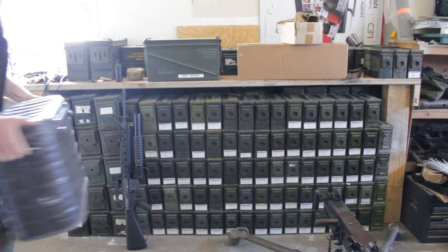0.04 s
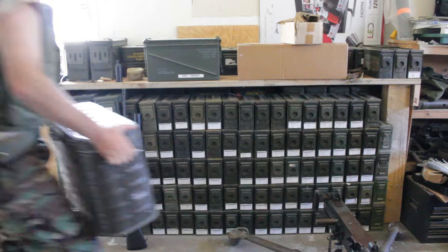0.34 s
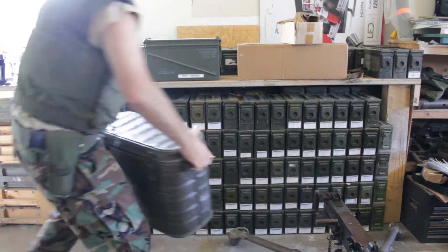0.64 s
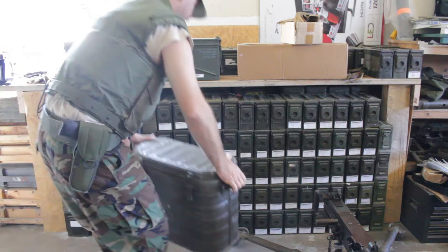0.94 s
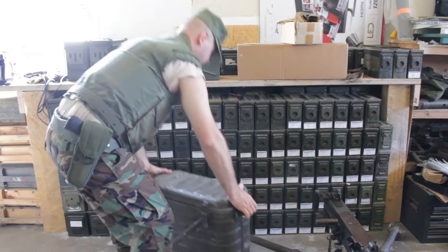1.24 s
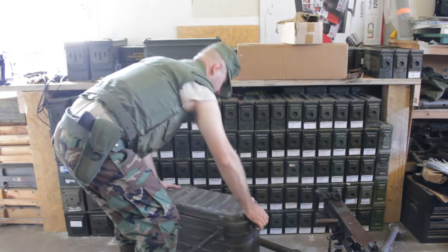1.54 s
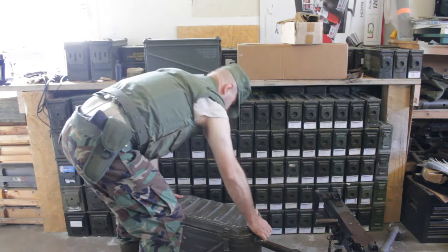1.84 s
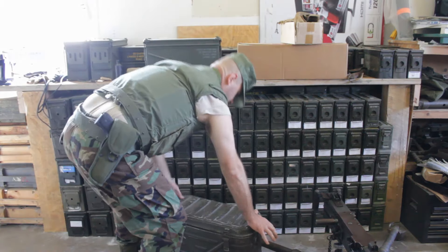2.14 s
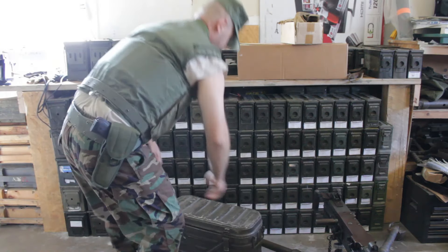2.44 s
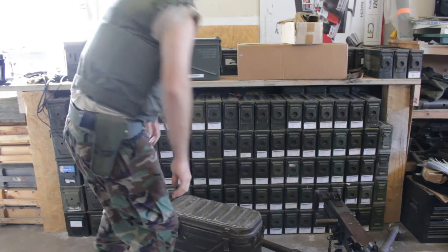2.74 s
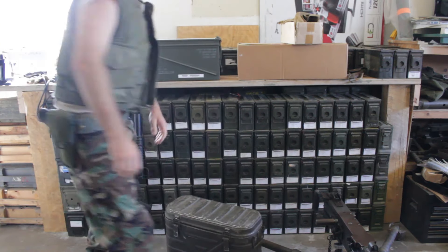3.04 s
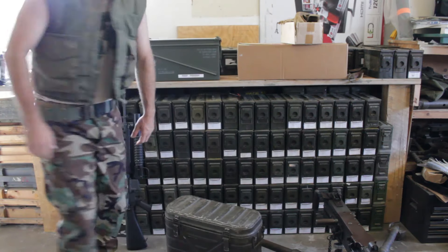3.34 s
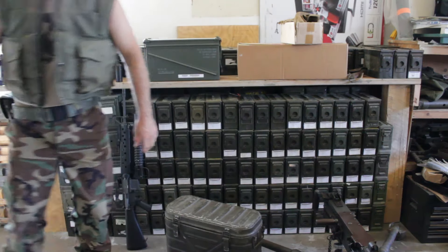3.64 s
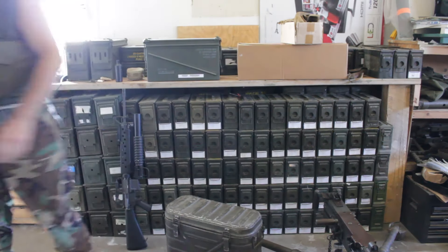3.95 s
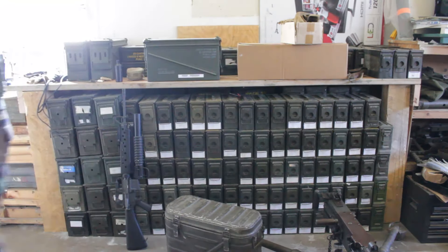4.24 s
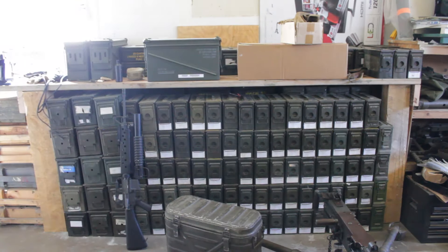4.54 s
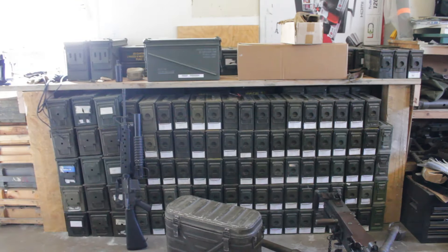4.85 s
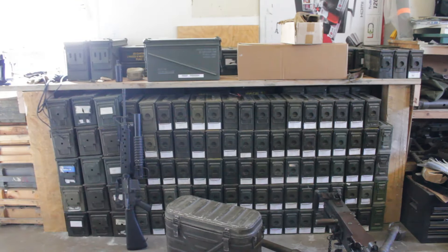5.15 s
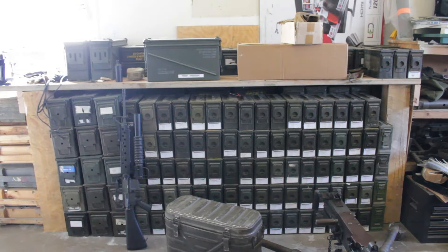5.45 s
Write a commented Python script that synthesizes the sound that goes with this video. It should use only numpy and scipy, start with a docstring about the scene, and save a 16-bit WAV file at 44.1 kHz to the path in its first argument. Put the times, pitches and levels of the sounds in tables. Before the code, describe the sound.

A few boot steps, rustling fabric and creaking straps lead up to the loud, hollow crash of a metal container landing on a concrete floor. Dry hinges squeak and two steel handles rattle to rest against its side. More steps follow with small clicks of gear and a juddering rubber scuff. The sounds are near, in a slightly echoing workshop with a faint steady hum.

```python
"""A workshop with a concrete floor. A man carries in a big metal container and sets it down with a
crash and a hollow boom. Its two handles squeak on dry hinges, fall against the shell and bounce to
rest. He walks off, boots thudding, cloth swishing and buckles tapping, and one rubber sole judders
over the floor. Shelves and walls answer the hits; a faint hum and hiss lie under it all."""
import sys
import numpy as np
from scipy import signal
from scipy.fft import rfft, irfft, next_fast_len
from scipy.io import wavfile
from scipy.ndimage import map_coordinates

SR = 44100
rng = np.random.default_rng(int(sys.argv[2]) if len(sys.argv) > 2 else 0)


def wrap_up_sound(samples):
    """Save the sound to the file named by the first command line argument, as 16-bit audio."""
    columns = np.atleast_2d(samples).T
    # keep every value between -1 and 1, then stretch to whole-number steps
    tamed = np.clip(columns, -1, 1)
    steps = np.round(tamed * 32767).astype(np.int16)
    wavfile.write(sys.argv[1], SR, steps)


N = 250488
TIME = np.arange(N) / SR
AGE = np.arange(SR * 3 // 4) / SR  # seconds since a hit

# The container hits the floor. Each row: start in seconds, crash level in dB, decay (t60) in seconds.
LANDINGS = [(1.8157, -3, 0.056), (1.8245, -17.5, 0.2), (1.891, -28, 0.05), (1.952, -31, 0.044)]
# Ringing metal. Each row: pitch in Hz, relative level in dB, decay (t60) in seconds.
SHELL_MODES = [(99.5, -9, 0.35), (129, -4.5, 0.22), (186.6, 4, 0.41), (227.5, 2, 0.33), (260, 3.5, 0.31),
               (310.4, 4, 0.2), (328.5, 6, 0.21), (371.5, 4, 0.25), (408, -2, 0.23), (442, -5.5, 0.37),
               (515, -10, .25), (584, -5, 0.35), (649, -4.5, 0.27), (810, -11, 0.26), (833, -21, 0.45),
               (870, -13, 0.33), (1003, -1.5, 0.18), (1076, -4, 0.2), (1200, -31, 0.55), (1466, -8, 0.16)]
HANDLE_MODES = [(1130, -6, 0.2), (2900, 1, 0.083), (3550, -8, 0.084), (4280, -5, .15), (4630, 1, 0.1),
                (5030, -2, 0.084), (5740, -3, 0.118), (5930, -4, 0.14), (8370, -4, 0.13), (11330, -8, 0.11)]
PANEL_MODES = [(302, -11, 0.2), (381, -5, 0.072), (445.5, -1.5, 0.093), (532, -4, 0.046), (602, 4.5, 0.037),
               (709, -3, 0.052)]  # the end panel under a handle

# The handles fall on the shell and rebound ever sooner. Each entry: start in seconds.
BOUNCE_TIMES = [2.172, 2.3664, 2.536, 2.674, 2.8066, 2.9253, 3.0255, 3.111, 3.171, 3.2194]
# The second handle grazes the rim as it falls. Each row: start in seconds, clank level in dB.
RIM_GRAZES = [(2.3445, -28), (2.353, -26.5)]
CLANK_DB, CLANK_LOSS_DB = -15.5, 3.5  # the first clank; what each rebound loses
CLANK_T60_S, CLANK_T60_RATIO = 0.2, 0.93  # the first clank's decay; each decay over the one before
EDGE_DB, EDGE_SLOPE = 1, 1.38  # bright edge over the first clank; dB it moves per dB of clank
KNOCK_DB, KNOCK_LOSS_DB = -19.5, 3  # the first knock on the shell; what each rebound loses

# Squeak tones, one list per hinge. Each row: pitch in Hz, relative level in dB.
HINGE_TONES = [
    [(4425, -12), (5819, -15), (6551, -5), (8877, 0), (12760, -15), (12915, 4.5)],
    [(5771, -23), (9141, -2), (12920, -10), (14115, -17)],
]
# Moments of binding, one list per hinge.
# Each row: middle in seconds, length in seconds, squeak level in dB, scrape level in dB.
HINGE_BINDS = [
    [(2.094, .034, -33, -36), (2.13, 0.042, -41, -27), (2.25, 0.094, -28.5, -31), (2.447, 0.038, -31, -48)],
    [(2.387, 0.022, -15.5, -25.5), (2.44, 0.027, -30, -47)],
]

# Footfalls. Each row: start in seconds, thud level in dB, thud pitch in Hz, slap level in dB.
FOOTFALLS = [(.393, -24.5, 198, -29), (1.139, -35, 200, -27.5), (1.289, -45, 250, -38),
             (2.288, -40, 130, -37), (2.901, -49, 250, -35.5), (2.958, -38, 283, -30),
             (3.847, -47, 150, -45.5), (4.811, -27.5, 148, -34.5)]
# A sole rolls over grit. Each row: middle in seconds, length in seconds, level in dB.
GRIT_ROLLS = [(0.468, 0.16, -45), (3.955, .11, -45.5)]
SLIDE_S, SLIDE_LENGTH_S, RUB_DB = 4.812, 0.19, -33.5  # the boot slides: start, length, level
GRIP_S, GRIP_LENGTH_S, GRIP_DB = 4.973, 0.063, -23.5  # the sole grips: middle, length, level
SLIP_HZ = 415.5  # slips a second in the judder

# Buckles and gear tap. Each row: start in seconds, level in dB, pitch in Hz.
BUCKLE_TAPS = [(0.7013, -29.5, 960), (0.8953, -29.5, 2800), (1.0225, -29.5, 1600), (1.166, -36, 3200),
               (2.912, -35, 2760), (3.912, -38, 2800), (4.116, -36, 2590), (4.5361, -28, 3520),
               (4.5716, -31, 3300), (4.7128, -30, 5200), (4.7343, -34, 5300), (4.768, -28.5, 5170),
               (5.4636, -37.5, 2300)]
# Strained webbing creaks. Each row: start in seconds, end in seconds, level in dB, pitch in Hz.
WEBBING_CREAKS = [(1.4, 1.45, -38.5, 2540), (1.508, 1.695, -37, 2270), (4.4423, 4.63, -35, 3580)]
TICK_GAP_S, TICK_GAP_SCATTER, TICK_SCATTER_DB = .041, .08, 2  # tick spacing; spread of spacing, level
CLICK_DB, CLICK_DB_PER_OCTAVE = -.5, 2.5  # click on a tap at 2500 Hz; higher taps click harder
# One swish for each move of an arm or leg. Each row: middle in seconds, length in seconds,
# swish level in dB, pitch in Hz, level of the folds in dB.
CLOTH_MOVES = [(0.01, 0.08, -51.5, 2500, -53), (.5, 0.18, -51, 2500, -50.5),
               (0.662, 0.12, -43.5, 2290, -51), (0.79, 0.083, -46.5, 2300, -59),
               (0.917, 0.087, -38, 2560, -45), (1.042, 0.062, -42, 2230, -42.5),
               (1.17, 0.12, -44, 2600, -47), (1.406, 0.098, -44, 2630, -49), (1.602, 0.27, -45, 2460, -54),
               (2.618, 0.38, -43, 2700, -44), (2.971, 0.12, -39, 2580, -42), (3.15, 0.16, -51, 2500, -51.5),
               (3.67, 0.075, -53.5, 2300, -52), (3.91, 0.12, -47.5, 2500, -55),
               (4.113, 0.1, -39.5, 2450, -55), (4.243, .13, -38.5, 2730, -48),
               (4.41, 0.052, -54, 2000, -47), (4.555, .17, -40, 2820, -46.5),
               (4.75, 0.26, -40.5, 2800, -56)]
CLOTH_HZ = 2500  # the swish pitch that leaves CLOTH_EQ unshifted

# The workshop's hum. Each row: pitch in Hz, level in dB.
HUM_TONES = [(91, -62.5), (185, -65.5), (276, -69.5), (461, -75), (1080, -68)]
# The fader ride on the hiss. Each row: time in seconds, level in dB.
HISS_RIDE = [(0, -51.5), (.7, -51.5), (1.4, -48), (1.8, -48), (1.95, -58), (3.2, -52.5), (3.8, -64),
             (4.8, -52.5), (5.68, -59)]
# The tail off the walls. Each row: frequency in Hz, decay (t60) in seconds.
WALL_DECAY = [(100, 0.46), (400, 0.43), (2500, 0.44), (6000, .4), (15000, 0.29)]

# Tone colours. Each row: frequency in Hz, relative spectral level in dB.
CRASH_EQ = [(40, -40), (75, -32), (110, 3), (200, -5), (400, -3.5), (550, -3), (800, -4.5), (1050, -9.5),
            (1350, -5), (1750, -14.5), (2400, -9), (2900, -14), (5000, -18), (9000, -26.5), (16000, -34)]  # container on concrete
CLANK_EQ = [(500, -25), (1200, -3), (2200, -5), (3300, 1.5), (3900, -3.5), (5300, 2.5), (7000, -11),
            (10000, -10.5), (16000, -43.5)]  # steel on steel
EDGE_EQ = [(2000, -19), (5000, -3), (8000, 2), (10000, -2.5), (11500, 2), (13000, -4), (14700, 5),
           (16000, -19)]  # the bright top of a hard hit
KNOCK_EQ = [(120, -35), (220, -13.5), (300, -7), (450, -6), (630, -0.5), (900, -7), (1300, -7.5),
            (2500, -26)]  # the hollow shell under a handle
RUB_EQ = [(150, -18), (400, -5), (900, -9.5), (1750, -5.5), (2200, -0.5), (3050, -1), (3700, -6),
          (7000, -16), (16000, -29)]  # sliding rubber
JUDDER_EQ = [(200, -20), (410, 0), (830, 5.5), (1400, -3), (2500, 0.5), (3400, 1), (5500, -11), (8000, -19),
             (16000, -29)]  # gripping rubber
CLOTH_EQ = [(500, -19), (1400, -4), (2000, 2), (2800, 1), (3900, -2), (5000, -7), (8000, -17.5),
            (16000, -22)]  # swishing fabric
FOLDS_EQ = [(130, -24), (350, -2), (700, -3.5), (1200, -1), (2500, -22.5)]  # flapping folds
AIR_EQ = [(15, -42.5), (25, -8), (92, -4.5), (108, -5), (123, -15), (175, -9), (217, -15), (270, -6.5),
          (326, -12), (373, -6), (624, -10), (1070, -10), (2350, -12.5), (3520, -14), (16000, -25.5)]  # room tone
SLAP_EQ = [(60, -24), (150, -17), (280, 1.5), (500, -10.5), (1200, -20.5), (3000, -33), (10000, -42)]
DUST_EQ = [(200, -24), (600, -16), (1400, -1), (2800, -4), (5500, -2), (8000, -9), (13000, -11),
           (16000, -19)]
GRIT_EQ = [(60, -10), (300, 1), (1500, 1), (5000, 2), (10000, -2), (16000, -2)]
HISS_EQ = [(60, -11), (300, 2.5), (1500, -1), (5000, 2.5), (10000, -3), (16000, -5)]


def container(boom_hz=284):
    """One edge crashes down and rings the shell; then the bottom lands flat and booms."""
    crash, body = np.zeros(N), np.zeros(N)
    for start, db, t60 in LANDINGS:
        add(crash, start, amp(db) * burst(CRASH_EQ, t60, attack=0.00018))
    edge_lands, bottom_lands = LANDINGS[0][0], LANDINGS[1][0]
    add(body, edge_lands, amp(-16.5) * ring(SHELL_MODES, scatter_db=0.5, attack=0.008))
    add(body, bottom_lands, amp(1.5) * ping(boom_hz, t60=0.087, attack=0.004))
    return room(crash, wet_db=-6.5) + room(body, wet_db=-18.5)


def handles():
    """Each bounce clanks the steel and knocks the shell, softer every time; a graze only clanks."""
    out = np.zeros(N)
    for k, start in enumerate(BOUNCE_TIMES):
        shell = amp(-4) * burst(KNOCK_EQ, t60=0.2, attack=0.0012)
        panel = amp(-0.5) * ring(PANEL_MODES, scatter_db=1.5, attack=0.0021)
        knock = amp(KNOCK_DB - k * KNOCK_LOSS_DB) * (shell + panel)
        add(out, start, clank(CLANK_DB - k * CLANK_LOSS_DB, CLANK_T60_S * CLANK_T60_RATIO ** k))
        add(out, start, room(knock, wet_db=-9.5))
    for start, db in RIM_GRAZES:
        add(out, start, clank(db, t60=.12))
    return out


def clank(db, t60):
    """Steel on steel: the harder the hit, the brighter its edge."""
    steel = burst(CLANK_EQ, t60, attack=0.00021)
    steel += amp(-12) * ring(HANDLE_MODES, scatter_db=1.5, attack=.0003)
    edge = burst(EDGE_EQ, t60, attack=0.00024)
    snap = amp(8) * burst(EDGE_EQ, t60=0.0062, attack=0.00035)
    edge_db = CLANK_DB + EDGE_DB + EDGE_SLOPE * (db - CLANK_DB)
    return room(amp(db) * steel + amp(edge_db) * (edge + snap), wet_db=-4)


def hinges():
    """Dry pivots scrape and sing in thin tones each time they bind."""
    scrapes, squeaks = np.zeros(N), np.zeros(N)
    for binds, tones in zip(HINGE_BINDS, HINGE_TONES):
        pitch_jitter = .0008 * wobble(70) + .0028 * wobble(600)
        clock = TIME + np.cumsum(pitch_jitter) / SR  # a hinge's tones all bend together
        squeak = np.zeros(N)
        for hz, db in tones:
            flutter_db = 2.5 * wobble(60) + 1.5 * wobble(500)
            squeak += amp(db + flutter_db) * np.sin(2 * np.pi * hz * clock)
        scrape = amp(-5) * noise(EDGE_EQ, grain_db=4)
        scrape += amp(-3) * noise(CLANK_EQ, grain_db=3.5)
        scrape += amp(-13) * noise(KNOCK_EQ)
        for middle, length, squeak_db, scrape_db in binds:
            friction = swell(middle, length, shape=3.2)
            squeaks += amp(squeak_db) * friction * unit(squeak)
            scrapes += amp(scrape_db) * friction * scrape
    return room(scrapes, wet_db=-4.5) + room(squeaks, wet_db=-14)


def boots():
    """Each step layers the heel's low push on the concrete, the boot's thud and the sole's slap."""
    out = np.zeros(N)
    for start, thud_db, thud_hz, slap_db in FOOTFALLS:
        push = amp(-8.5) * ping(hz=85, t60=0.041, attack=0.0012)
        thud = ping(thud_hz, t60=0.065, attack=0.00067)
        slap = burst(SLAP_EQ, t60=0.075, attack=0.0016)
        add(out, start, amp(thud_db) * (thud + push) + amp(slap_db) * slap)
    return room(out, wet_db=-6.5)


def scuff():
    """A rubber sole rubs along the floor, then grips, sticking and slipping in a fast judder."""
    slide = amp(RUB_DB) * stroke(SLIDE_S, SLIDE_LENGTH_S, attack=0.022, t60=0.42)
    grip = amp(GRIP_DB) * swell(GRIP_S, GRIP_LENGTH_S, shape=1.4)
    slip_count = np.cumsum(SLIP_HZ * (1 + .006 * wobble(300))) / SR
    slips = np.diff(np.floor(slip_count), prepend=0) * amp(1.4 * wobble(400))  # one pulse per slip
    judder = amp(-4) * coloured(slips, JUDDER_EQ)
    dust = amp(-2.5) * noise(DUST_EQ, grain_db=1)
    rub = slide * noise(RUB_EQ, grain_db=1.5)
    return room(rub + grip * dust, wet_db=-8) + room(grip * judder, wet_db=-7.5)


def gear():
    """Buckles tap singly; strained webbing gives way in uneven runs of ticks."""
    out = np.zeros(N)
    for start, db, hz in BUCKLE_TAPS:
        add(out, start, tap(db, hz))
    for start, end, db, hz in WEBBING_CREAKS:
        for late, harder in rng.standard_normal(size=(8, 2)):
            if start < end:
                add(out, start, tap(db + TICK_SCATTER_DB * harder, hz))
            start += TICK_GAP_S * np.exp(TICK_GAP_SCATTER * late)
    return out


def tap(db, hz):
    """A dead tap with a sharp tick on top; small, high ones click harder and die sooner."""
    colour = [(hz / 5, -14), (hz * 0.22, -6), (hz, 0), (hz * 1.23, -1), (hz * 1.5, -12), (hz * 4, -35)]
    body = amp(1.5) * burst(colour, t60=0.028 * np.sqrt(1500 / hz), attack=0.0002)
    tick = amp(4.5) * ping(hz, t60=14 / hz, attack=.00005)
    click_db = CLICK_DB + CLICK_DB_PER_OCTAVE * np.log2(hz / 2500)
    click = amp(click_db) * burst(CLANK_EQ, t60=0.0074, attack=.0001)
    return room(amp(db) * (body + tick + click), wet_db=-3.5)


def cloth():
    """Sleeves and trouser legs swish, each move at its own pitch, and their folds flap."""
    swish, fold_power = np.zeros(N), np.zeros(N)
    weave = rng.standard_normal(N) * amp(2.7 * wobble(900))
    for middle, length, db, hz, folds_db in CLOTH_MOVES:
        move = swell(middle, length, shape=1.55)
        near = np.abs(TIME - middle) < 2 * length
        shifted_eq = np.multiply(CLOTH_EQ, [hz / CLOTH_HZ, 1])
        swish[near] += amp(db) * move[near] * coloured(weave[near], shifted_eq)
        fold_power += (amp(folds_db) * move) ** 2
    flutter = amp(0.72 * wobble(45))
    folds = np.sqrt(fold_power) * noise(FOLDS_EQ, grain_db=4)
    return flutter * (swish + folds)


def grit():
    """Fine dust hisses as a sole rolls off the concrete."""
    pressure = sum(amp(db) * swell(middle, length, shape=1.7) for middle, length, db in GRIT_ROLLS)
    return pressure * noise(GRIT_EQ)


def room_tone():
    """The bed: still air, a wavering hum and a hiss that swells and sinks."""
    hum = np.zeros(N)
    for hz, db in HUM_TONES:
        level = amp(db + 3.5 * wobble(7.2))
        hum += level * np.sin(2 * np.pi * hz * TIME + 1.1 * wobble(9.5))
    hiss_db = np.interp(TIME, *np.transpose(HISS_RIDE))
    hiss = amp(hiss_db) * noise(HISS_EQ)
    return amp(-49) * noise(AIR_EQ) + hum + hiss


def room(x, wet_db):
    """Add the room: near shelves scatter the highs at once; the walls give a longer, duller tail."""
    hz, t, bands = signal.stft(rng.standard_normal(len(AGE)), SR, nperseg=256)
    decay = amp(-60 * t / along(WALL_DECAY, hz)[:, None])
    walls = signal.istft(bands * decay, SR, nperseg=256)[1][:len(AGE)]
    walls *= 1 - np.exp(-AGE / 0.0052)  # the tail blooms
    scatter = rng.standard_normal(len(AGE)) * fade(t60=0.088, attack=0.0032)
    shelves = signal.sosfilt(signal.butter(2, 600, "high", fs=SR, output="sos"), scatter)
    impulse = walls + amp(5) * shelves
    return x + amp(wet_db) * signal.fftconvolve(x, impulse / np.linalg.norm(impulse))[:len(x)]


def ping(hz, t60, attack):
    """One struck mode: a dying sine."""
    return np.sin(2 * np.pi * hz * AGE) * fade(t60, attack)


def ring(modes, scatter_db, attack):
    """Distinct modes, struck at new strengths; neighbours swing in opposite directions."""
    return sum((-1) ** k * amp(db + scatter_db * rng.normal()) * ping(hz, t60, attack)
               for k, (hz, db, t60) in enumerate(modes))


def burst(eq, t60, attack):
    """Countless close modes struck at once: a noise that dies away."""
    phases = rng.random(len(AGE) // 2 + 1)
    flat_noise = irfft(np.exp(2j * np.pi * phases), len(AGE))
    return coloured(flat_noise, eq) * fade(t60, attack)


def noise(eq, grain_db=0):
    """Coloured noise; grain_db roughens it into tiny slips."""
    return coloured(rng.standard_normal(N) * amp(grain_db * wobble(900)), eq)


def fade(t60, attack):
    """Envelope of a hit: a quick rise, and a fall of 60 dB in t60 seconds."""
    return amp(-60 * AGE / t60) * (1 - np.exp(-AGE / attack))


def swell(middle, length, shape):
    """A rise and fall, half as strong at both ends of its length; a larger shape steepens the flanks."""
    return .5 ** np.minimum(np.abs(2 * (TIME - middle) / length) ** shape, 40)


def stroke(start, length, attack, t60):
    """Attack, hold and release."""
    rise = np.clip((TIME - start) / attack, 0, 1)
    return rise * amp(-60 * np.maximum(TIME - start - length, 0) / t60)


def wobble(rate):
    """A smooth random curve, rate knots a second."""
    return map_coordinates(rng.standard_normal(int(N * rate / SR) + 4), [TIME * rate])


def coloured(x, eq):
    """x through a (Hz, dB) curve, at rms 1."""
    return unit(filtered(x, lambda hz: amp(along(eq, hz))))


def filtered(x, response):
    """x through a frequency response."""
    size = next_fast_len(len(x) + 8192)
    return irfft(rfft(x, size) * response(np.fft.rfftfreq(size, 1 / SR)), size)[:len(x)]


def along(points, hz):
    """Read (Hz, value) points on a log axis."""
    freqs, values = np.transpose(points)
    return np.interp(np.log(hz + 1), np.log(freqs + 1), values)


def amp(db):
    """Decibels to gain."""
    return 10 ** (np.asarray(db) / 20)


def unit(x):
    """Scale to rms 1."""
    return x / np.sqrt(np.mean(x ** 2) + 1e-20)


def add(track, start, sound):
    """Mix a sound into the track at start seconds."""
    part = track[round(start * SR):][:len(sound)]
    part += sound[:len(part)]


def scene():
    """The mono mix: the metal, the man's movements and the bed."""
    metal = container() + handles() + hinges()
    movement = boots() + grit() + gear() + cloth() + scuff()
    return (metal + movement + room_tone())[None]


def record(dry):
    """The master: round off the highest peaks, thin the deep bass and cut the very top."""
    low_cut_hz, top_hz = 45, 15900
    rounded = dry[0] / (1 + dry[0] ** 6) ** (1 / 6)
    return filtered(rounded, lambda hz: (hz < top_hz) * (1j * hz / (1j * hz + low_cut_hz)) ** 2)[None]


dry = scene()
out = record(dry)
wrap_up_sound(out)
```